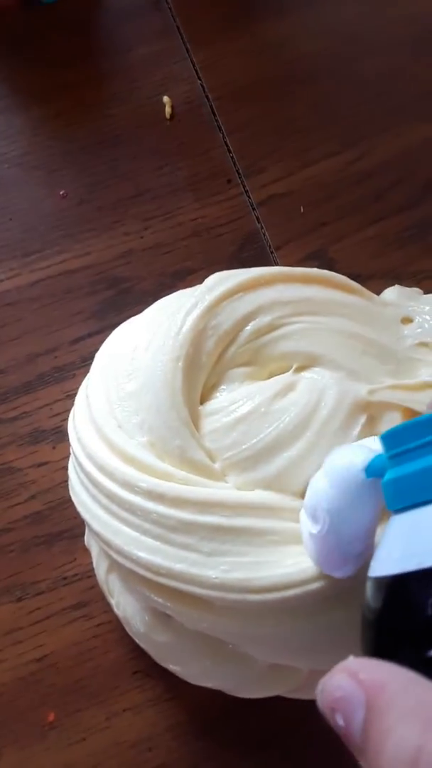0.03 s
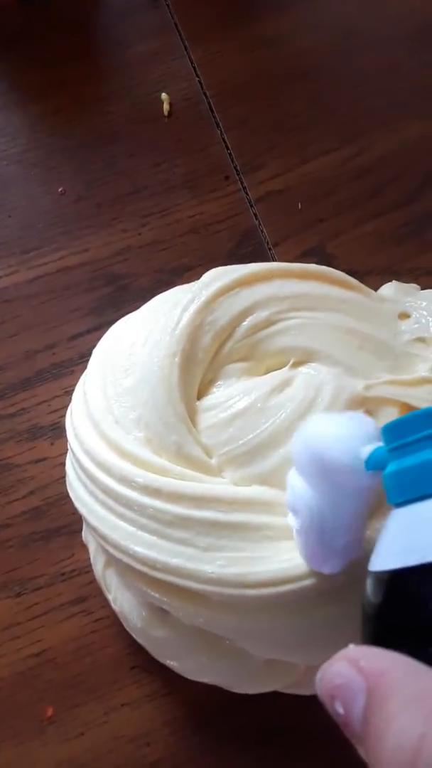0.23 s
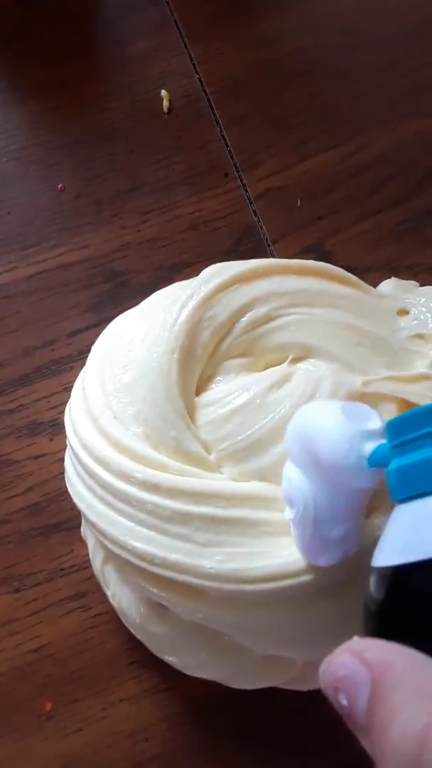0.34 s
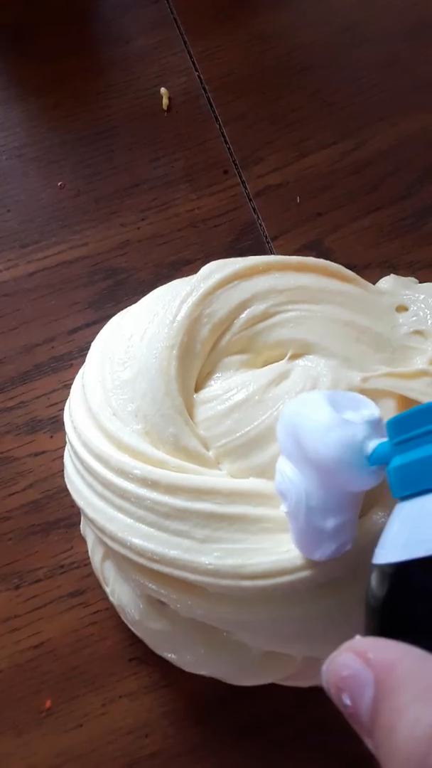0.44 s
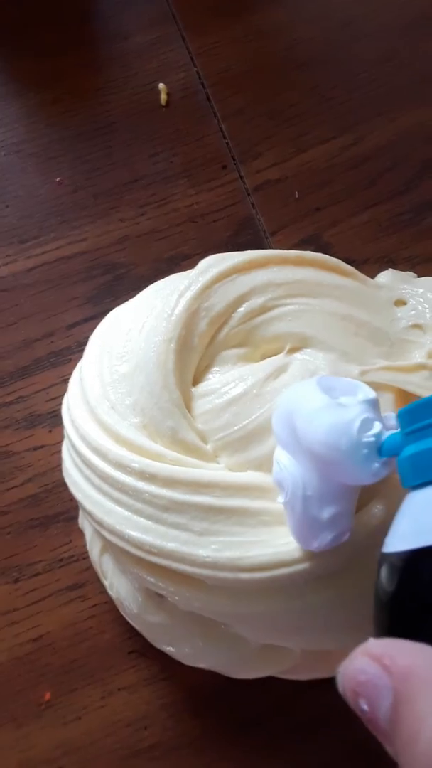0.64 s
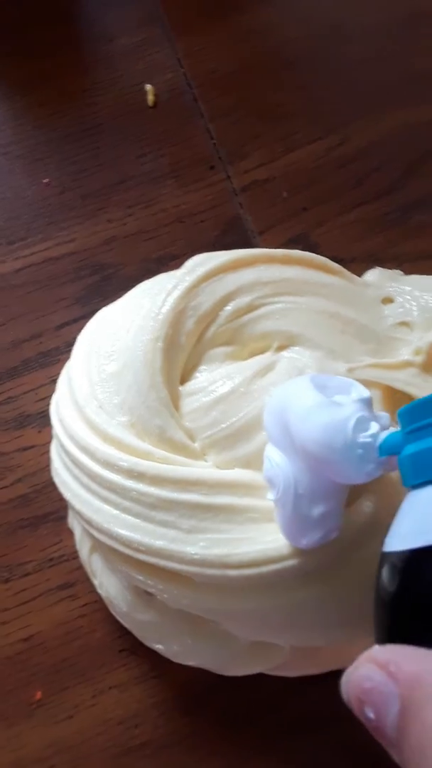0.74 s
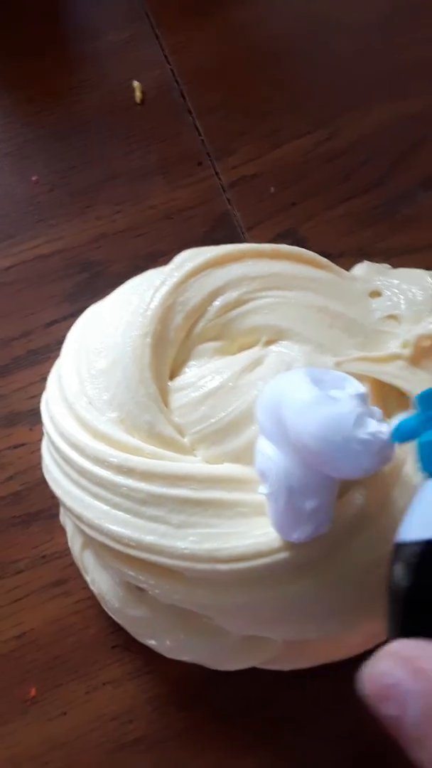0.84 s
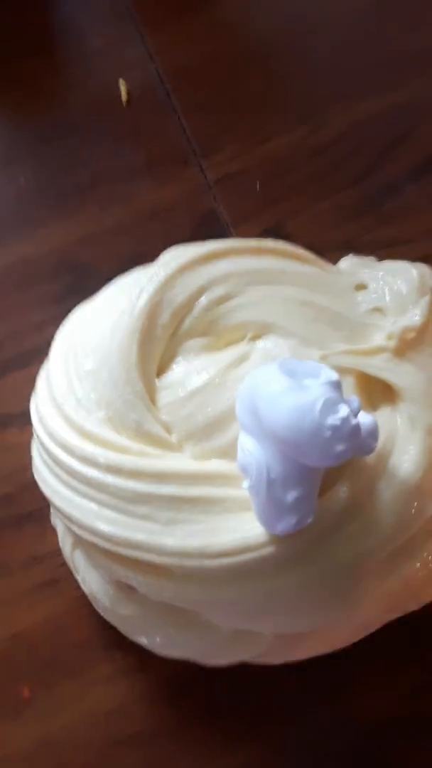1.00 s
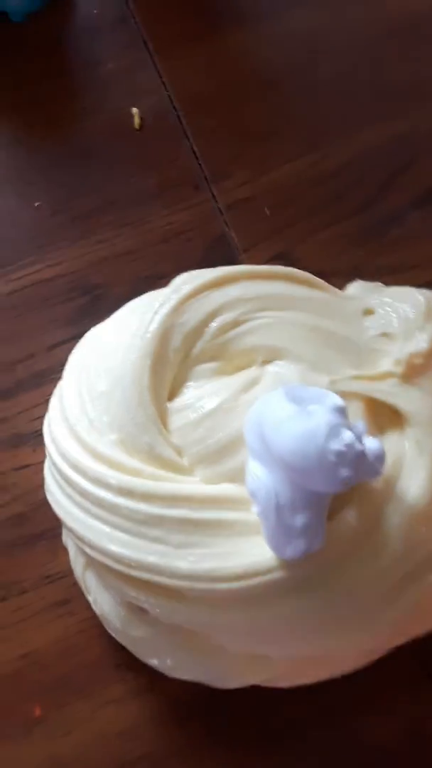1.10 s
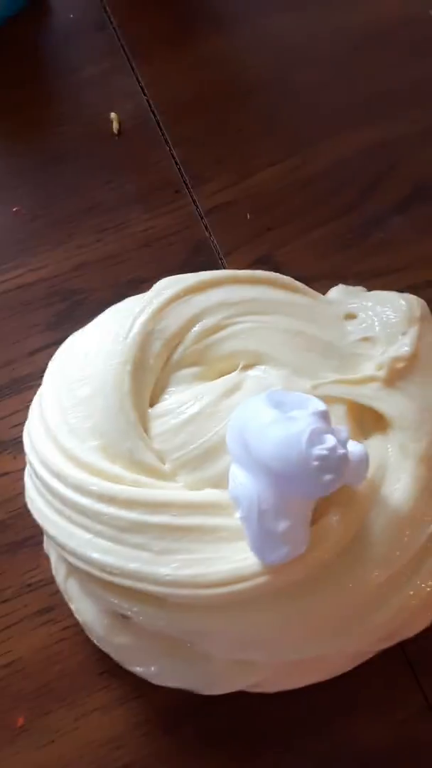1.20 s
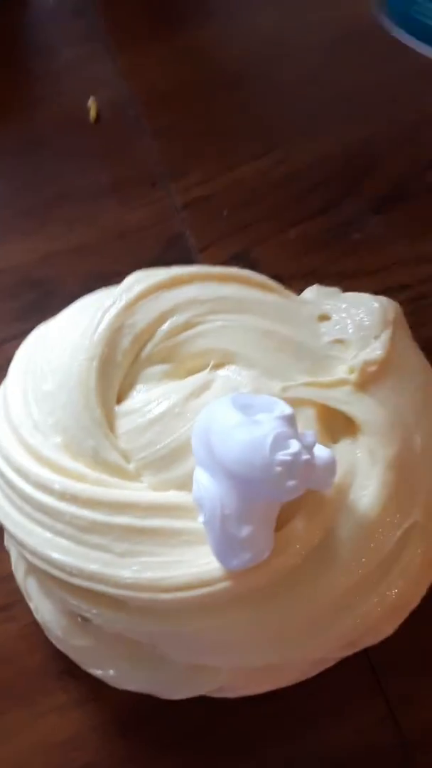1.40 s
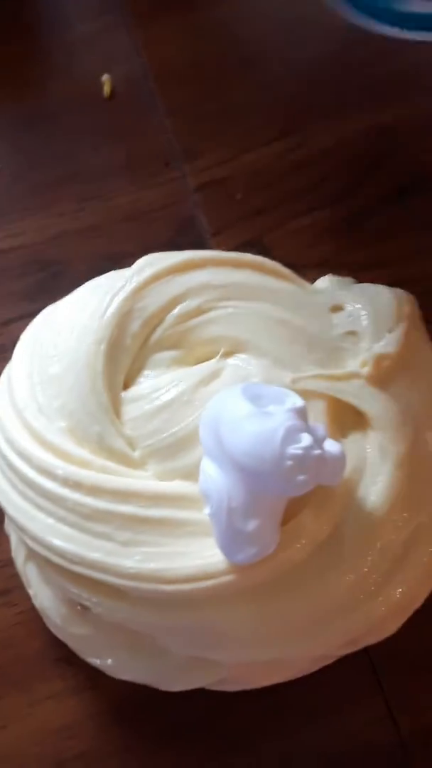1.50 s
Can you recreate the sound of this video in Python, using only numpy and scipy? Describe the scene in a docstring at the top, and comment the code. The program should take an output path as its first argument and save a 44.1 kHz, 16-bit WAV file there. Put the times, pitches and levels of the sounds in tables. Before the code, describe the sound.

A pump dispenser squirts foam with soft bubbling, then a brief crackling splutter.

```python
"""Bubbles patter softly in a nozzle as a hand pump pushes foam onto slime on a table.
Air then breaks through in eight spluttering spurts: ringing pops, crackling spray and low puffs.
The small, quiet room rings out. Faint hisses follow as the pump eases, the foam settles
and the bottle is moved away."""
import sys
import numpy as np
from scipy import signal
from scipy.fft import rfft, irfft, next_fast_len
from scipy.io import wavfile

SR = 44100
rng = np.random.default_rng(int(sys.argv[2]) if len(sys.argv) > 2 else 0)


def digitize_waveform(pressure):
    """Quantize a signal to 16-bit integers and store it at the path in sys.argv[1].

    Rows of a 2-D input are taken as channels; values are limited to [-1, 1].
    """
    field = np.atleast_2d(pressure).T
    bounded = np.clip(field, -1, 1)
    quanta = np.round(bounded * 32767).astype(np.int16)
    wavfile.write(sys.argv[1], SR, quanta)


N = 68355
T = np.arange(N) / SR
FFT_SIZE = next_fast_len(N + SR // 8)
HZ = np.maximum(np.arange(FFT_SIZE // 2 + 1) * SR / FFT_SIZE, 1)
SIDE = np.array([[1], [-1]])  # left +, right -
FLOW_END_S, SPRAY_ATTACK_S = 0.58, 0.0067
MAX_BUBBLES = 600  # per layer

# Bubble patter in even flow (time [s], level [dB])
PATTER_LEVEL = [(0, -28.5), (.165, -28), (.205, -32), (.24, -23.5), (.44, -21.5), (.6, -32.5)]
# Air pocket in the nozzle (time [s], pitch [Hz])
POCKET_PITCH = [(0, 2225), (.17, 1950), (.245, 1650), (.28, 1926), (.55, 2160)]
# Rustle of flowing foam (frequency [Hz], gain [dB])
FLOW_SPECTRUM = [(80, -25.5), (400, 2), (750, -5), (1500, -1), (5000, -19.5), (15000, -33)]
# Air spurts (start [s], length [s], pops [dB], spray [dB], mist [dB], puff [dB])
AIR_SPURTS = [(0.248, 0.0039, -19, -24, -52.5, -34.5), (0.263, 0.021, -15, -23.5, -41, -46),
              (0.297, .035, -14.5, -23.5, -39.5, -33.5), (0.345, 0.034, -18, -24, -50, -31.5),
              (0.392, 0.042, -13, -23.5, -46, -35), (0.4542, 0.037, -16.5, -26.5, -43.5, -34.5),
              (0.488, 0.046, -14, -26.5, -47, -40), (0.543, 0.024, -18.5, -31, -53.5, -49.5)]
# Big bubbles, ahead of the nozzle response (time [s], peak [dB], pitch [Hz], decay [s])
BIG_BUBBLES = [(.0383, -24, 2190, 0.00065), (0.2486, -10, 1557, 0.0032), (0.2645, -4, 1920, 0.0013),
               (0.2698, -5, 1800, .0008), (0.3186, -8, 1893, 0.0022), (0.3615, -8.5, 1880, 0.0022),
               (.3752, -6.5, 1988, 0.0013), (.3993, -6.5, 2150, .001), (0.4141, -9, 1830, 0.0022),
               (0.4258, -3.5, 1923, 0.0013), (.497, -6.5, 2070, 0.0015), (0.5133, -10.5, 2057, 0.0021),
               (.5466, -5.5, 2180, 0.00088)]
# Nozzle resonances (frequency [Hz], gain [dB])
NOZZLE_RESPONSE = [(1230, 2.5), (1550, -5), (1890, -1), (2450, 3.5), (3050, -7)]
# Spray, finest mist and air puff (frequency [Hz], gain [dB])
SPRAY_SPECTRUM = [(900, -21.5), (1400, -4), (2550, 8), (3100, -0.5), (5900, 1), (8200, -7.5),
                  (10000, -18.5)]
MIST_SPECTRUM = [(5000, -16.5), (9000, 3), (11000, -1), (13500, -0.5), (16000, -9.5)]
PUFF_SPECTRUM = [(60, -26), (130, -7.5), (380, -1.5), (740, -1), (1300, 5.5), (2000, -22.5)]
# Resonances of the wet opening (time [s], lower [Hz], upper [Hz])
SLIT_MODES = [(.3, 4137, 5200), (.51, 3590, 6120)]
# Sharp spits of spray (time [s], level [dB], centre [Hz])
SPRAY_SPITS = [(0.2484, -28.5, 6010), (.329, -25, 7500), (0.4787, -16.5, 6000), (0.5127, -19, 7250)]
# Pump chamber resonance (time [s], pitch [Hz])
CHAMBER_PITCH = [(0.291, 1550), (.44, 1413)]
# Pump return, foam settling, bottle moving (start [s], level [dB], rise [s], decay [s], centre [Hz])
HISS_EVENTS = [(0.649, -52, 0.012, 0.055, 7450), (.86, -69, 0.075, 0.2, 2694),
               (1.484, -62, 0.016, 0.055, 2300)]
# Nozzle nearer the left microphone port (frequency [Hz], left minus right [dB])
PORT_BALANCE = [(250, 1), (740, -2.5), (1800, 9.5), (8000, 12.5), (15000, 3.5)]
# Phase between the ports (frequency [Hz], left lead [rad])
PORT_LEAD = [(600, -0.5), (2600, 9.5), (6500, 10.5), (15000, 21)]
# Diffuse room field (frequency [Hz], left-right coherence [0..1])
ROOM_COHERENCE = [(30, .7), (150, 1), (450, 0.82), (2000, 0)]
# Reverberation send (frequency [Hz], gain [dB])
REVERB_SEND = [(200, -18), (750, -3.5), (2200, -15.5), (3200, -12), (8000, -17.5)]
# Room background noise (frequency [Hz], gain [dB])
AMBIENCE_SPECTRUM = [(25, -39.5), (115, -9.5), (260, -3), (520, -10.5), (2100, -21), (3500, -37.5),
                     (15000, -39.5)]


def from_db(db):
    """Decibels to gain."""
    return 10 ** (np.asarray(db) / 20)


def unit_rms(x):
    """Scale to unit rms."""
    return x / np.sqrt(np.mean(x ** 2) + 1e-20)


def at_hz(table):
    """Table interpolated over log frequency."""
    hz, values = np.transpose(table)
    return np.interp(np.log(HZ), np.log(hz), values)


def at_time(table, time_s):
    """Table interpolated over time."""
    return np.interp(time_s, *np.transpose(table))


def filtered(x, response):
    """Apply a frequency response."""
    return irfft(rfft(x, FFT_SIZE) * response, FFT_SIZE)[..., :N]


def coloured(x, spectrum):
    """Apply a spectrum table; unit rms."""
    return unit_rms(filtered(x, from_db(at_hz(spectrum))))


def half_octave(x, low_hz):
    """Half-octave band above low_hz."""
    return filtered(x, (HZ >= low_hz) & (HZ < np.sqrt(2) * low_hz))


def band_noise(shape, centre_hz, sigma_oct):
    """Noise in a bell-shaped band; unit rms."""
    bell = np.exp(-0.5 * (np.log2(HZ / centre_hz) / sigma_oct) ** 2)
    return unit_rms(filtered(rng.standard_normal(shape), bell))


def gate(time_s, start_s, length_s, attack_s=0.002, release_s=0.0035):
    """Linear rise, hold, exponential release."""
    rise = np.clip((time_s - start_s) / attack_s, 0, 1)
    return rise * np.exp(-np.maximum(time_s - start_s - length_s, 0) / release_s)


def fade(start_s, decay_s):
    """Sudden start, exponential decay."""
    return (T >= start_s) * np.exp(-np.maximum(T - start_s, 0) / decay_s)


def gliding_ring(x, pitch_curve, width_hz):
    """Resonator following a pitch curve; unit peak gain."""
    carrier = np.exp(2j * np.pi * np.cumsum(at_time(pitch_curve, T)) / SR)
    pole = np.exp(-np.pi * width_hz / SR)
    return 2 * np.imag(carrier * signal.lfilter([1 - pole], [1, -pole], x / carrier + 1e-18))


def bubble_times(rate_per_s, end_s):
    """Bubbles arrive in turn, at uneven gaps."""
    times_s = np.cumsum(rng.uniform(0.5, 1.5, MAX_BUBBLES)) / rate_per_s
    return times_s[times_s < end_s]


def jitter(times_s):
    """One unit normal deviate per bubble."""
    return rng.standard_normal(MAX_BUBBLES)[:len(times_s)]


def pops(times_s, gains, pitches_hz, decays_s, rise_s=0.00031, glide_per_s=18):
    """Each bubble rings for a few cycles, rising in pitch as it opens."""
    out = np.zeros((2, N + SR))
    t = T[:SR // 60]
    bubbles = np.broadcast(times_s, gains, pitches_hz, decays_s)
    draws = rng.uniform(-1, 1, (MAX_BUBBLES, 2))
    for (start_s, gain, hz, decay_s), (polarity, offset_rad) in zip(bubbles, draws):
        envelope = (1 - np.exp(-t / rise_s)) ** 2 * np.exp(-t / decay_s)
        phase = 2 * np.pi * hz * (t + glide_per_s * t * t / 2) + offset_rad * SIDE  # each at its own spot
        i = int(start_s * SR)
        out[:, i:i + len(t)] += gain * np.sign(polarity) * envelope / envelope.max() * np.sin(phase)
    return out[:, :N]


def small_pops(times_s, gains, log_spread):
    """Small bubbles ring near the pitch of the nozzle's air pocket."""
    detune = np.exp(log_spread * rng.uniform(-0.89, 1, MAX_BUBBLES)[:len(times_s)])
    return pops(times_s, gains, at_time(POCKET_PITCH, times_s) * detune, decays_s=0.00087)


def crackle(rate_per_s=3500, spread_db=4.5, rush_gain=0.3):
    """Foam films tear in dense snaps over a smooth rush of air."""
    sizes = from_db(spread_db * np.minimum(rng.exponential(1, N), 4)) * rng.choice([-1, 1], N)
    snaps = unit_rms(sizes * (rng.random(N) < rate_per_s / SR))
    return snaps + rush_gain * rng.standard_normal(N)


def even_flow(rate_per_s=270, spread_db=2.5, rustle_db=-43):
    """Small bubbles patter through the nozzle over the rustle of flowing foam."""
    times_s = bubble_times(rate_per_s, PATTER_LEVEL[-1][0])
    gains = from_db(at_time(PATTER_LEVEL, times_s) + spread_db * jitter(times_s))
    patter = small_pops(times_s, gains, log_spread=0.114)
    return patter + from_db(rustle_db) * gate(T, 0, FLOW_END_S) * coloured(crackle(), FLOW_SPECTRUM)


def bursting_bubbles(small_s, spread_db=1.5, refill_s=0.0017):
    """Big single pops and a run of small ones per spurt, coloured by the nozzle."""
    big_s, big_db, big_hz, big_decay_s = np.transpose(BIG_BUBBLES)
    drive = sum(from_db(db) * gate(small_s, start_s, length_s) for start_s, length_s, db, *_ in AIR_SPURTS)
    clear_of_big = np.abs(small_s[:, None] - big_s - big_decay_s).min(axis=1) > refill_s
    gains = clear_of_big * drive * from_db(spread_db * jitter(small_s))
    small = small_pops(small_s, gains, log_spread=0.24)
    big = pops(big_s, from_db(big_db), big_hz, big_decay_s)
    return filtered(small + big, from_db(at_hz(NOZZLE_RESPONSE)))


def flicker(rate_per_s=260):
    """Fast random wander, clipped at two sigma."""
    wander = np.interp(T * rate_per_s, np.arange(N), rng.standard_normal(N))
    return np.clip(unit_rms(wander), -2, 2)


def clumped_crackle(spectrum, common_sigma_db=4, band_sigma_db=4.5, side_gain=0.37):
    """Crackle in millisecond clumps, each with its own colour."""
    noise = coloured(crackle() + side_gain * crackle() * SIDE, spectrum)
    common_db = common_sigma_db * flicker()
    out = 0
    for low_hz in 500 * np.sqrt(2) ** np.arange(10):
        out += half_octave(noise, low_hz) * from_db(common_db + band_sigma_db * flicker())
    return unit_rms(out)


def slit(x, width_hz=490, lower_db=4, upper_db=-1.5):
    """The wet opening adds two resonances that drift apart."""
    modes = np.array(SLIT_MODES)
    lower = from_db(lower_db) * gliding_ring(x, modes[:, [0, 1]], width_hz)
    upper = from_db(upper_db) * gliding_ring(x, modes[:, [0, 2]], width_hz)
    return unit_rms(x + lower + upper)


def splutter(pops_per_s=480):
    """Each spurt of air drives pops, crackling spray, fine mist and a low puff."""
    pop_times_s = bubble_times(pops_per_s, FLOW_END_S)
    spray = slit(clumped_crackle(SPRAY_SPECTRUM))
    mist = clumped_crackle(MIST_SPECTRUM)
    puff = coloured(crackle(), PUFF_SPECTRUM)
    out = bursting_bubbles(pop_times_s)
    for start_s, length_s, _, spray_db, mist_db, puff_db in AIR_SPURTS:
        liquid = from_db(spray_db) * spray + from_db(mist_db) * mist
        out += gate(T, start_s, length_s, SPRAY_ATTACK_S) * liquid
        out += gate(T, start_s, length_s) * from_db(puff_db) * puff
    return out


def gulp(pitch_hz=232, level_db=-36, decay_s=0.01):
    """Low damped swing as air first breaks through."""
    start_s = AIR_SPURTS[0][0]
    return from_db(level_db) * fade(start_s, decay_s) * np.sin(2 * np.pi * pitch_hz * (T - start_s))


def spray_ticks(rate_per_s=330, range_hz=(4290, 8500), re_spray_db=-2, spread_db=3):
    """Tiny bubbles in the spray burst with high, wet ticks."""
    times_s = bubble_times(rate_per_s, FLOW_END_S)
    drive = sum(from_db(spray_db) * gate(times_s, start_s, length_s, SPRAY_ATTACK_S)
                for start_s, length_s, _, spray_db, *_ in AIR_SPURTS)
    sizes = from_db(re_spray_db + spread_db * np.clip(jitter(times_s), -2, 2))
    pitches_hz = np.exp(rng.uniform(*np.log(range_hz), MAX_BUBBLES))[:len(times_s)]
    return pops(times_s, drive * sizes, pitches_hz, decays_s=0.00022)


def spits(decay_s=0.0012):
    """Single droplets tear off the nozzle in short, bright rasps."""
    return sum(from_db(db) * fade(start_s, decay_s) * band_noise(N, hz, sigma_oct=0.57)
               for start_s, db, hz in SPRAY_SPITS)


def chamber(x, gain_db=7.5, shut_s=0.47):
    """The pump chamber rings along while open."""
    open_s = AIR_SPURTS[0][0]
    drive = x * gate(T, open_s, shut_s - open_s)
    return from_db(gain_db) * gliding_ring(drive, CHAMBER_PITCH, width_hz=31)


def hisses():
    """Pump, foam and bottle each give a soft hiss that swells and dies."""
    out = 0
    for start_s, db, rise_s, decay_s, hz in HISS_EVENTS:
        swell = gate(T, start_s, rise_s, attack_s=rise_s, release_s=decay_s)
        out += from_db(db) * swell * band_noise((2, N), hz, sigma_oct=0.63)
    return out


def ports(x, scatter_db=-7.5, rise_s=0.00079, decay_s=0.0072, corner_hz=610):
    """Direct sound and its scatter off table and hand reach two microphone ports."""
    echoes = rng.standard_normal((2, N)) * np.exp(-T / decay_s) * (1 - np.exp(-T / rise_s))
    echoes /= np.sqrt(np.sum(echoes ** 2, axis=1, keepdims=True))
    scatter = rfft(echoes, FFT_SIZE) * HZ / np.hypot(HZ, corner_hz)  # long waves pass round the hand
    ratio = from_db(at_hz(PORT_BALANCE))
    direct = np.array([ratio, np.exp(-1j * at_hz(PORT_LEAD))]) * np.sqrt(2 / (1 + ratio ** 2))
    return filtered(x, direct * (1 + from_db(scatter_db) * scatter))


def diffuse_noise():
    """Noise from all sides: coherent in the bass, unrelated in the treble."""
    mid, side = rng.standard_normal((2, N))
    mid_share = (1 + at_hz(ROOM_COHERENCE)) / 2
    return filtered(mid, np.sqrt(mid_share)) + filtered(side, np.sqrt(1 - mid_share)) * SIDE


def room(x, bass_t60_s=0.66, air_loss_hz=12000, build_s=0.008):
    """Diffuse tail; air loss shortens the treble."""
    noise = diffuse_noise()
    tail = 0
    for low_hz in 70 * np.sqrt(2) ** np.arange(16):
        t60_s = bass_t60_s / (1 + (low_hz / air_loss_hz) ** 2)
        envelope = from_db(-60 * T / t60_s) * (1 - np.exp(-T / build_s))
        tail += half_octave(noise, low_hz) * envelope / np.sqrt(np.sum(envelope ** 2))
    return filtered(x, rfft(tail, FFT_SIZE) * from_db(at_hz(REVERB_SEND)))


def ambience(noise_db=-54.5, hum_db=-62, hum_hz=(111, 184, 299, 405), half_width_hz=10):
    """Quiet room noise with a faint, wavering hum."""
    noise = coloured(diffuse_noise(), AMBIENCE_SPECTRUM)
    lines = sum(1 / (1 + ((HZ - hz) / half_width_hz) ** 2) for hz in hum_hz)
    hum = unit_rms(filtered(rng.standard_normal(N), lines))
    return from_db(noise_db) * noise + from_db(hum_db) * hum


def scene(low_cut_hz=120):
    """Close nozzle, its room and the closing hisses."""
    foam = even_flow() + splutter() + gulp() + spray_ticks() + spits()
    low_cut = signal.butter(4, low_cut_hz, "high", fs=SR, output="sos")
    nozzle = signal.sosfilt(low_cut, foam + chamber(foam))
    background = ambience()
    lean_right = from_db([[-1], [1]])
    return ports(nozzle) + (room(nozzle[0]) + background) * lean_right + hisses()


def record(dry, peak_limit=0.67, cutoff_hz=15750):
    """Soft peak limiter, then a steep low-pass."""
    rounded = dry / (1 + (dry / peak_limit) ** 6) ** (1 / 6)
    return filtered(rounded, 1 / np.sqrt(1 + (HZ / cutoff_hz) ** 200))


dry = scene()
out = record(dry)
digitize_waveform(out)
```